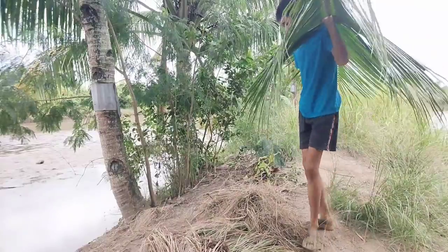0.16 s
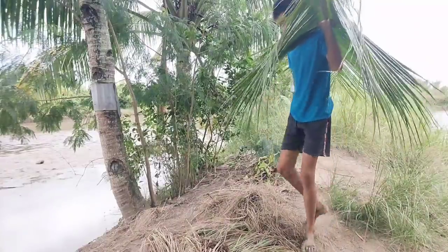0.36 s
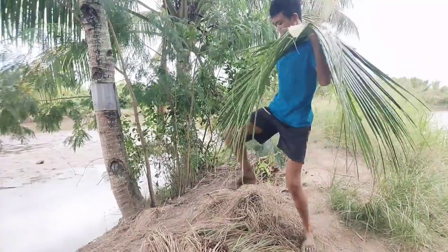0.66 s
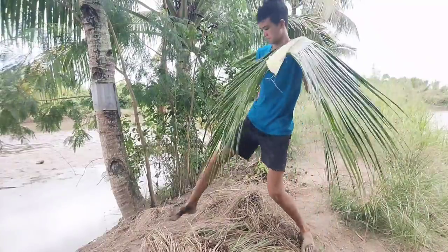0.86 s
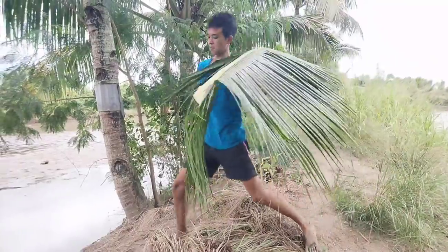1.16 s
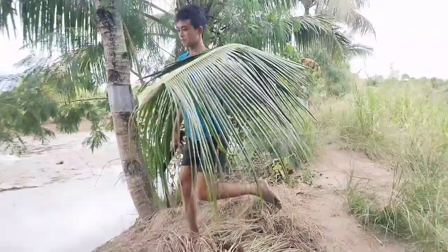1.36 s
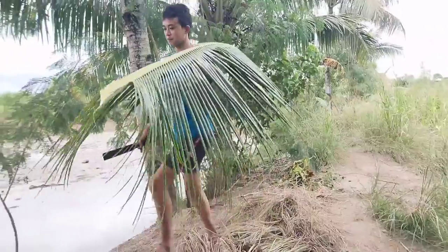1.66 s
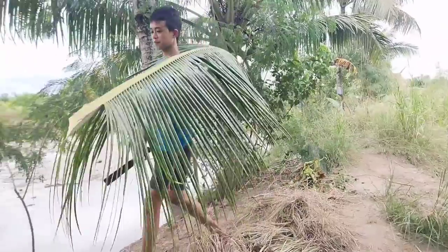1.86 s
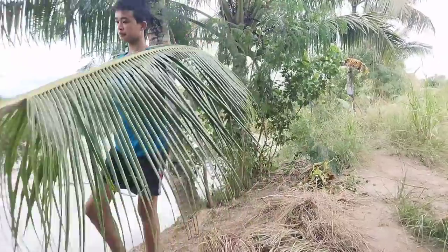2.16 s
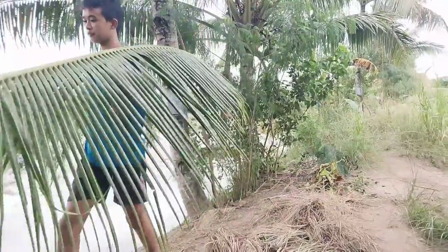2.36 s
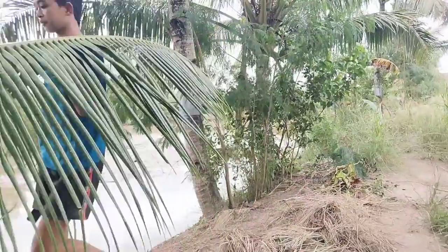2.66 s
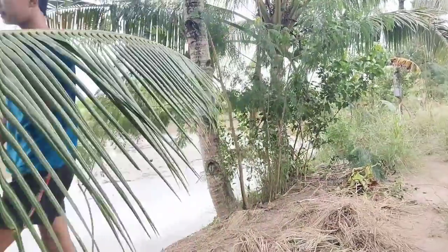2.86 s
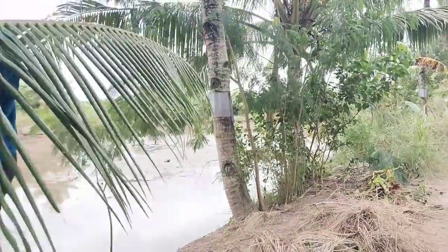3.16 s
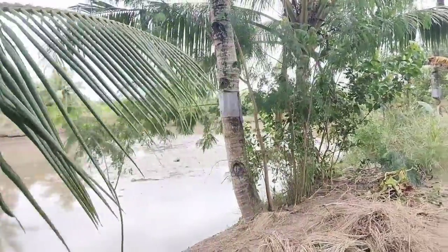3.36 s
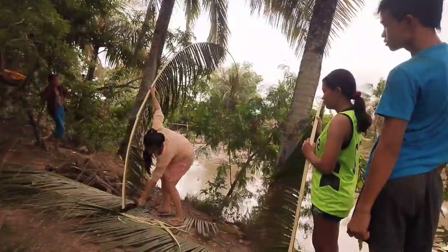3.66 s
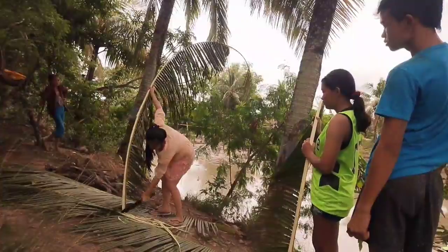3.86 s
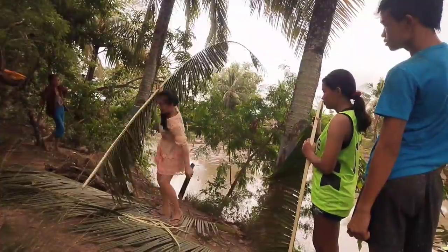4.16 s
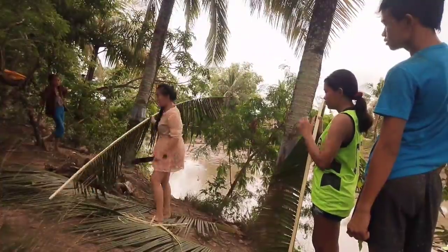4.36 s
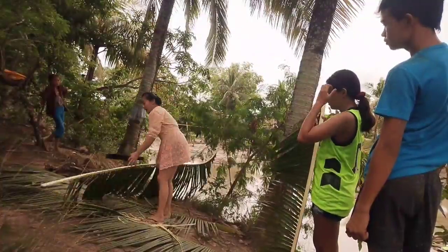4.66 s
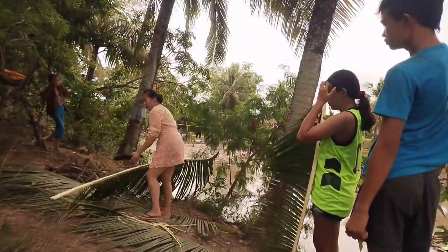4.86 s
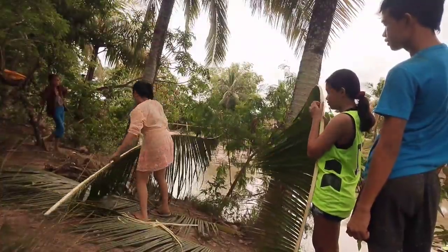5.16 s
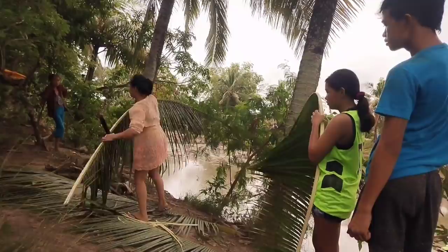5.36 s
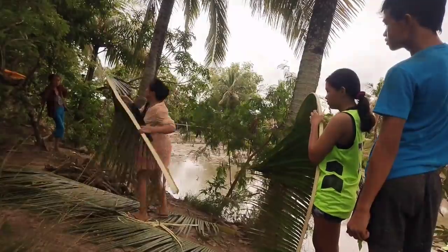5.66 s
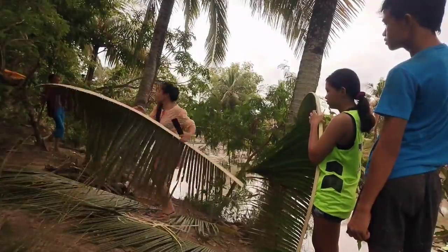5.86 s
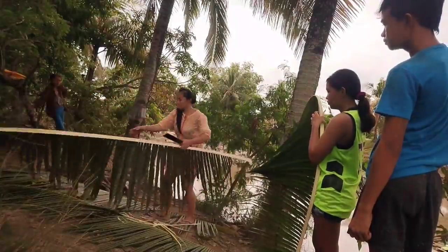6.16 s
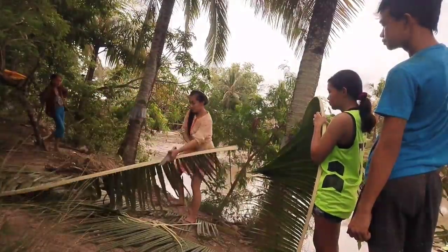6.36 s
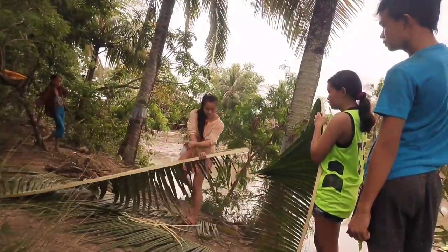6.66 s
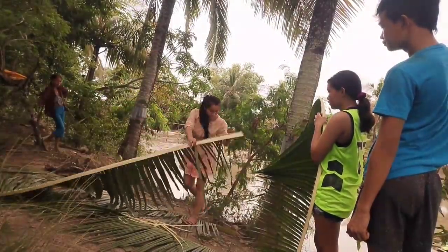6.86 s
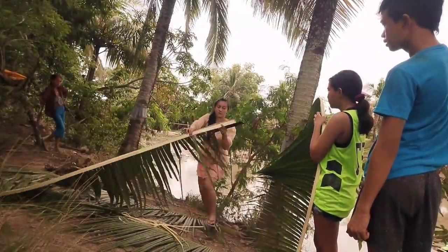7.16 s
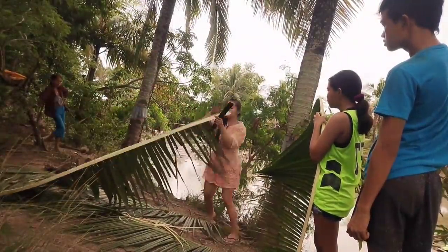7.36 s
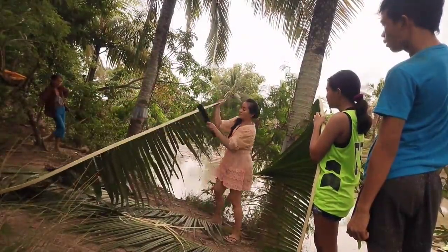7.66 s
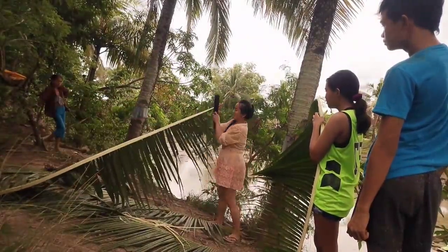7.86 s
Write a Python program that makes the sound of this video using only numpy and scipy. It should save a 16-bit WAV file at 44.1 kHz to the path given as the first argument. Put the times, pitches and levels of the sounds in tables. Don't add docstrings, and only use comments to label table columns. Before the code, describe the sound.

Dry frond rustles and sharp stalk cracks among bright near birdsong, followed by an accelerating insect trill and far whistles ringing between trees.

```python
import sys
import numpy as np
from scipy import signal
from scipy.fft import rfft, irfft
from scipy.io import wavfile
from scipy.ndimage import uniform_filter1d

SR = 44100
rng = np.random.default_rng(int(sys.argv[2]) if len(sys.argv) > 2 else 0)


def waveform_to_disk(signal):
    frames = np.transpose(np.atleast_2d(signal))
    scaled = np.clip(frames, -1, 1) * 32767
    samples = np.round(scaled).astype(np.int16)
    wavfile.write(sys.argv[1], SR, samples)


def invert_db(x):
    u = np.asarray(x, float) / 20
    return 10 ** u


N = 353682


def evened(x):
    return x / np.sqrt(np.mean(x ** 2) + 1e-20)


def read(points, hz):
    f, value = np.transpose(points)
    return np.interp(np.log(hz + 1), np.log(f + 1), value)


def add(mix, s, sound):
    part = mix[..., max(round(s * SR), 0):][..., :sound.shape[-1]]
    part += sound[..., :part.shape[-1]]


def pan(x, pan_db):
    return x * invert_db(np.array([[.5], [-.5]]) * pan_db)


def band(x, edge_hz):
    return signal.sosfilt(signal.butter(4, edge_hz, "band", fs=SR, output="sos"), x)


def resonate(x, hz, width_hz):
    turn = np.exp(2j * np.pi * hz * np.arange(len(x)) / SR)
    r = np.exp(-np.pi * width_hz / SR)
    return 2 * (turn * signal.lfilter([(1 - r) ** 2], [1, -2 * r, r * r], x / turn)).real


def flutter(size):
    return evened(uniform_filter1d(uniform_filter1d(rng.standard_normal(N), size), size))


def air(spectrum, patchy_db):
    frames, hz = N // 256 + 5, np.fft.rfftfreq(1024, 1 / SR)
    a, b, patches = rng.standard_normal((frames, 513, 3)).T
    patches = evened(uniform_filter1d(uniform_filter1d(patches, size=10, axis=0), size=12, axis=1))
    z = (a + 1j * b) * invert_db(read(spectrum, hz)[:, None] + patchy_db * patches)
    return evened(signal.istft(z, nperseg=1024, noverlap=768)[1][:N])


def sides(x):
    return np.array([[1], [-1]]) * x


# (frequency [Hz], density [dB per Hz])
GROVE = [(18, -42), (30, -14), (108, -28.5), (270, 1), (606, -4), (1870, -12), (2130, -12.5), (2620, -12),
         (5890, -13), (13600, -23.5), (15500, -41.5)]
GROVE_SIDE = [(18, -36.5), (30, -8), (1020, -10), (1110, -4), (2490, -17.5), (3320, -33.5), (6370, -25),
              (15500, -36)]


def grove_air():
    return invert_db(-52) * air(GROVE, 2.0) + sides(invert_db(-64) * air(GROVE_SIDE, 1.2))


# (frequency [Hz], density [dB per Hz])
BANK = [(12, -45.5), (20, -29), (104, 6.5), (153, -4), (232, -17), (1930, -36), (4990, -27.5), (7570, -33),
        (9200, -41), (12900, -38.5), (15600, -42)]
BANK_SIDE = [(12, -40), (20, -2), (64, 7), (202, -13), (1110, -20.5), (1630, -25), (4850, -18.5),
             (8500, -26), (13500, -27), (15600, -48)]
# (time [s], rumble level [dB])
BANK_FADE = [
    (0.0, -45),
    (3.621, -47),
    (3.85, -85.5),
]


def bank_air():
    s, db = np.transpose(BANK_FADE)
    fade = invert_db(np.interp(np.arange(N) / SR, s, db - np.median(db)))
    middle = air(BANK, 1.62)
    width = air(BANK_SIDE, 1.2) - 2.0 * resonate(middle, 45, 70)
    return fade * (invert_db(-45) * middle + sides(invert_db(-54.5) * width))


# (start [s], end [s], pitch [Hz], width [Hz],
# level [dB])
DRONES = [(.14, 0.82, 6230, 160, -54), (0.51, 0.795, 4850, 510, -53.5), (2.9, 5.6, 1074, 12, -71),
          (5.203, 8.02, 1141, 8, -69), (0.855, .9, 3170, 640, -47), (1.104, 1.197, 2210, 300, -50),
          (2.313, 2.37, 4970, 700, -51.5), (2.552, 2.64, 5240, 600, -54), (5.38, 5.45, 5300, 900, -58.5),
          (6.89, 7.15, 3700, 900, -54), (7.03, 7.2, 5250, 500, -57), (7.766, 8.06, 5600, 2300, -48),
          (.0, .09, 5500, 250, -54), (7.585, 7.7, 4900, 600, -53), (7.87, 8.04, 3350, 60, -44),
          (7.48, 7.8, 5100, 1400, -56), (4.56, 4.95, 4600, 1300, -53), (.03, .11, 8400, 600, -58),
          (1.1, 1.25, 4900, 700, -54), (1.6, 1.72, 4900, 600, -53), (1.2, 1.37, 10800, 400, -66),
          (1.48, 1.56, 10800, 400, -62), (5.42, 5.58, 4580, 150, -62), (5.42, 5.56, 5420, 200, -63),
          (5.78, 5.93, 5780, 150, -63), (5.79, 5.95, 4800, 250, -61), (5.21, 5.33, 3300, 1100, -58),
          (6.72, 6.83, 3200, 150, -52), (6.4, 7.75, 7200, 1200, -63), (.12, .25, 6200, 400, -48)]


def drones():
    t, noise = np.arange(N) / SR, rng.standard_normal(N)
    out = np.zeros(N)
    for start, end, hz, width_hz, db in DRONES:
        gate = np.clip(np.minimum(t - start, end - t) / 0.016, 0, 1)
        out += invert_db(db) * evened(resonate(noise, hz, width_hz)) * gate
    return out


# (time [s], peak [dB], length [s], centre [Hz])
RUSTLES = [(0.03, -57, 0.06, 8500), (1.164, -42, 0.052, 6000), (1.289, -50, 0.022, 6000),
           (1.31, -54, 0.065, 13500), (1.323, -53, .04, 4500), (1.385, -57, .05, 8000),
           (1.43, -57, 0.035, 14500), (1.424, -55, .04, 5200), (1.557, -51, 0.068, 6500),
           (1.976, -56, 0.04, 9000), (2.576, -51, 0.04, 5000), (3.31, -56, 0.04, 11000)]


def rustles():
    out, t = np.zeros((2, N)), np.arange(SR // 5) / SR
    hz = np.fft.rfftfreq(len(t), 1 / SR) + 1
    for s, db, length, centre_hz in RUSTLES:
        snaps = rng.standard_normal((2, len(t))) * invert_db(3.1 * np.minimum(rng.exponential(1, len(t)), 4))
        snaps[1] = 0.36 * snaps[0] + 1.3 * snaps[1]
        colour = invert_db(-8 * np.log2(hz / centre_hz) ** 2) / (1 + (1500 / hz) ** 2)
        brush = evened(irfft(rfft(snaps) * colour, len(t)))
        swell = np.sin(np.pi * np.clip(t / length, 0, 1) ** .7)
        add(out, s, pan(invert_db(db + 0.5) * brush * swell, 1.9))
    return out


# (time [s], peak [dB], pitch [Hz], ring t60 [s])
CRACKS = [
    (1.179, -25, 4770, 0.038),
    (1.1807, -24, 3700, .008),
    (1.186, -29.5, 2460, 0.04),
    (1.191, -19, 3700, 0.0079),
    (1.394, -24.5, 2880, 0.0065),
    (2.585, -18, 224, 0.0056),
]
# (time [s], peak [dB], pitch [Hz])
TICKS = [
    (1.1692, -34, 8000),
    (1.1821, -30, 8000),
    (1.189, -32, 9000),
    (1.4381, -34, 13000),
    (1.4645, -36, 11000),
    (1.5708, -31, 10000),
]


def cracks():
    out = np.zeros((2, N))
    t = np.arange(SR // 20) / SR
    for s, db, hz, t60 in CRACKS:
        add(out, s, invert_db(db - 60 * t / t60) * np.sin(2 * np.pi * hz * t)[None])
    t = np.arange(-40, 40) / SR
    for s, db, hz in TICKS:
        add(out, s, pan(invert_db(db) * np.cos(2 * np.pi * hz * t) * np.exp(-(t / .00006) ** 2), 1.5))
    return out


# (frequency [Hz], t60 [s])
TREES = [(1500, 0.54), (4000, 0.81), (9000, 0.43)]


def echo(x, stretch, start_s):
    taps = np.zeros((2, SR))
    at = np.arange(0, SR - 20, 20) + rng.integers(0, 20, (2, SR // 20 - 1))
    np.put_along_axis(taps, at, rng.choice([-1., 1.], at.shape), axis=1)
    hz, t, z = signal.stft(taps, SR, nperseg=256)
    z = z * invert_db(-60 * t / (stretch * read(TREES, hz)[:, None])) * np.clip(t / start_s, 0, 1)
    tail = signal.istft(z, SR, nperseg=256)[1]
    return signal.fftconvolve(x[None], tail / np.linalg.norm(tail[0]), axes=1)[:, :N]


def bird(notes, partials, waver, halo_db, halo_size):
    out, shake = np.zeros(N), flutter(size=90)
    for rows in notes:
        s, hz, db = np.transpose(rows)
        t = np.arange(s[0], max(s[-1], s[0] + .004), 1 / SR)
        effort_db = np.interp(t, s, db)
        pitch = uniform_filter1d(np.interp(t, s, hz), size=60) * (1 + waver * shake[(t * SR).astype(int) % N])
        turns = 2 * np.pi * np.cumsum(pitch) / SR
        tone = 0
        for off_hz, share_db in partials:
            share = invert_db(share_db + (share_db < -9) * .9 * (effort_db + 22))
            tone = tone + share * np.sin(turns + 2 * np.pi * off_hz * t)
        edge = np.sin(np.pi / 2 * np.clip(np.minimum(t - t[0], t[-1] - t) / .003, 0, 1)) ** 2
        add(out, s[0], np.sqrt(2) * invert_db(effort_db) * tone * edge)
    return out, invert_db(halo_db) * out * flutter(halo_size)


def strokes(rows, bend, rise_db, rise_s, fade_db_per_s, scoop_hz=0):
    u, notes = np.linspace(0, 1, 25), []
    for s, length, from_hz, to_hz, db in rows:
        t = length * u
        pitch = to_hz + (from_hz - to_hz) * (1 - u) ** bend - scoop_hz * np.exp(-t / .005)
        effort_db = db + rise_db * np.exp(-t / rise_s) + fade_db_per_s * t - 3 * u ** 8
        notes.append(np.transpose([s + t, pitch, effort_db]))
    return notes


def whistle(s, length, hz, climb_hz, db):
    t = np.linspace(0, length, 90)
    wobble = -np.cos(2 * np.pi * 47.5 * t) * np.exp(-t / .05)
    pitch = hz - climb_hz * np.exp(-(t / .024) ** 2) + 450 * wobble
    effort_db = db - 21 * np.exp(-t / 0.025) - 40 * t + 3 * wobble
    return np.transpose([s + t, pitch, effort_db])


def close_by(song, halo, pan_db, flutter_size):
    direct = pan(song * (1 + 0.1 * flutter(flutter_size)), pan_db)
    return direct + invert_db(-8.5) * echo(song, 0.15, 0.0021) + echo(halo, 0.11, 0.002)


# (offset [Hz], share [dB])
THIN_PARTIALS = [(-3900, -29), (-1.5, 1), (3903.5, -33), (7797, -43)]
# (start [s], length [s], held pitch [Hz], climb [Hz], level [dB])
THIN_WHISTLES = [
    (0.121, 0.1, 7170, 750, -17.5),
    (0.342, 0.169, 7480, 560, -20.5),
]
# (start [s], length [s], from [Hz], to [Hz], level [dB])
THIN_TWITTER = [(.229, 0.042, 7080, 7250, -24.5), (.283, 0.013, 7150, 7240, -41),
                (.523, 0.038, 7000, 7750, -38.5), (.565, 0.026, 7030, 7700, -39),
                (.612, 0.044, 7250, 7900, -38), (.657, 0.0165, 7230, 7850, -31.5),
                (.674, 0.016, 7550, 8050, -34.5), (.692, 0.028, 7200, 8500, -32),
                (.722, 0.035, 7480, 7950, -33.5), (.755, 0.019, 8450, 8000, -43),
                (.772, 0.022, 7820, 7850, -35.5)]


def thin_bird():
    notes = [whistle(*row) for row in THIN_WHISTLES] + strokes(THIN_TWITTER, 0.5, -8.5, 0.01, -7)
    song, halo = bird(notes, THIN_PARTIALS, 0.005, -24.0, halo_size=25)
    return close_by(song, halo, -5.5, flutter_size=200)


# (start [s], length [s], from [Hz], to [Hz], level [dB])
NEAR_HELD = [(.926, 0.016, 3650, 3570, -17.5), (.918, 0.0086, 3420, 3400, -27),
             (.94, 0.023, 3676, 3480, -18), (1.018, 0.064, 3693, 3390, -16.5),
             (1.219, .04, 2740, 3070, -18.5), (1.265, .011, 4520, 4300, -27),
             (1.539, 0.038, 3330, 3096, -21.5), (1.838, 0.034, 4350, 4190, -40.5),
             (1.895, .04, 3610, 3550, -36.5), (1.943, 0.032, 4600, 4420, -40)]
NEAR_SCOOPS = [
    (.884, 0.017, 3480, 3435, -22),
    (.902, 0.016, 3680, 3700, -14.5),
    (1.672, 0.089, 3744, 3413, -15),
]
NEAR_SWELLS = [
    (1.35, 0.045, 2300, 2180, -45.5),
    (1.467, 0.031, 4060, 3915, -22),
    (1.638, 0.026, 3040, 3060, -28),
    (1.274, .031, 4280, 4520, -29),
]
NEAR_SLURS = [(.871, 0.013, 3670, 2650, -37), (.958, 0.013, 3450, 2620, -26.5),
              (1.08, 0.0178, 3470, 2640, -23), (1.197, 0.013, 2690, 2550, -31),
              (1.312, 0.031, 4260, 2720, -29.5), (1.393, 0.006, 2330, 1890, -25),
              (1.505, 0.031, 3750, 2824, -24.5), (1.528, .012, 2910, 3300, -26),
              (1.87, 0.03, 4190, 3600, -35), (1.988, 0.012, 4950, 5050, -42.5),
              (2.012, .01, 4850, 4900, -50), (1.66, .013, 3080, 3350, -28), (2.065, 0.017, 4700, 4800, -51)]


def near_bird():
    notes = strokes(NEAR_HELD, 1.11, -15.5, 0.0046, -71)
    notes += strokes(NEAR_SCOOPS, 1.15, -11.5, 0.0045, -130, 510)
    notes += strokes(NEAR_SWELLS, 1.16, -13, 0.0061, 60, -300)
    notes += strokes(NEAR_SLURS, 1.11, -4, 0.0052, 30)
    song, halo = bird(notes, [(0.0069, 0.59)], 0.0061, -19.0, halo_size=22)
    return close_by(song, band(halo, (2450, 3900)), -.6, flutter_size=120)


def sweep(from_hz, to_hz, length_s):
    u = np.linspace(0, 1, round(length_s * SR))
    return np.sin(2 * np.pi * np.cumsum(from_hz + (to_hz - from_hz) * u) / SR) * np.sin(np.pi * u)


# (time [s], high chamber peak [dB], low chamber against it [dB])
SLOW = [(1.8422, -51, -20), (1.972, -49.5, -4), (2.0934, -47, -17), (2.214, -41.5, -13), (2.3286, -42, -4),
        (2.4422, -40.5, -3.5), (2.5604, -41, -2), (2.6761, -40, -1), (2.7923, -38, 0), (2.9027, -40, 1),
        (3.0074, -40, 3.5), (3.117, -39, 4), (3.219, -39, 2.5), (3.324, -39, 3.5), (3.4107, -42.5, 7),
        (3.472, -49, 11)]


def slow_strokes(efforts, flicks):
    t = np.arange(SR // 8) / SR
    for s, db, low_db in SLOW:
        stroke = invert_db(db - 6) * np.clip(t / 0.00043, 0, 1) * (np.exp(-t / 0.022) + .5 * np.exp(-t / 0.13))
        add(efforts[0], s, stroke)
        add(efforts[2], s + 0.0021, invert_db(low_db) * stroke)
        flick = sweep(4000, 9300, 0.021)
        add(flicks, s - .009, invert_db(db - 8) * flick * np.linspace(.6, 1.3, len(flick)))


def fast_strokes(efforts, flicks):
    k, t = np.arange(22), np.arange(SR // 8) / SR
    since = .0596 * k + .000355 * k ** 2
    peak_db = -25 - 5 * np.exp(-since / 0.082) - 5.5 * (since / since[-1]) ** 3
    for s, db in zip(3.4975 + since, peak_db):
        add(efforts[1], s, invert_db(db - 10) * np.clip(t / .003, 0, 1) * np.clip((.03 - t) / .012, 0, 1))
        add(efforts[2], s + 0.027, invert_db(db - 8.5) * np.clip(np.minimum(t / 0.0051, (.049 - t) / .016), 0, 1))
        late = np.clip((s - 4.42) / 0.17, 0, 1)
        add(flicks, s - .003, (0.5 + late) * invert_db(db - 9) * sweep(8600, 6200, 0.02))
        add(flicks, s - .03, late * invert_db(db - 23) * sweep(4300, 5900, .018))


def faint_strokes(efforts):
    t = np.arange(SR // 8) / SR
    for k in range(10):
        add(efforts[0], 6.45 + .123 * k, invert_db(-62) * np.exp(-t / 0.041))


# (from [Hz], to [Hz])
CHAMBERS = [
    (6640, 8300),
    (7350, 8200),
    (5810, 7000),
]


def insect():
    sizes = invert_db(0.64 * np.minimum(rng.exponential(1, N), 3))
    clicks = (rng.random(N) < 2500 / SR) * sizes * rng.choice([-1, 1], N)
    efforts, flicks = np.zeros((3, N)), np.zeros(N)
    slow_strokes(efforts, flicks)
    fast_strokes(efforts, flicks)
    faint_strokes(efforts)
    rung = [band(clicks * effort, edge) / band(clicks, edge).std() for effort, edge in zip(efforts, CHAMBERS)]
    rung[2] = 0.75 * rung[2] + 0.85 * resonate(rung[2], 6580, 510)
    rung[1] = 0.64 * rung[1] + 0.7 * resonate(rung[1], 7720, 500)
    rasp = invert_db(-15.5) * band(evened(clicks) * efforts.sum(0), (4500, 12500))
    buzz = sum(rung) + rasp + flicks * (2.1 + .8 * flutter(size=36))
    return buzz + invert_db(-3) * echo(buzz, 1.0, .01)[0]


# (start [s], length [s], from [Hz], to [Hz], level [dB])
DEEP_EARLY = [(4.243, .056, 2160, 2035, -57), (4.3, 0.072, 2200, 2700, -53),
              (4.365, 0.065, 2700, 2600, -58), (4.425, 0.034, 2604, 2215, -51.5),
              (4.566, .02, 3670, 4190, -50), (4.586, 0.09, 4200, 3900, -52), (4.59, .06, 4550, 4450, -55),
              (4.665, .015, 4090, 3800, -49), (5.188, 0.025, 2345, 2750, -56),
              (5.212, 0.021, 2300, 3310, -53), (5.22, .026, 3000, 4200, -48),
              (5.235, .012, 2490, 3300, -51), (5.53, .014, 3900, 3950, -55),
              (5.365, .02, 3930, 4170, -52.5), (5.43, 0.017, 3800, 4100, -53),
              (5.505, 0.029, 3960, 4000, -56.5), (5.512, 0.02, 5350, 5100, -56)]
DEEP_LATE = [(5.725, .035, 3450, 4280, -54), (5.766, 0.016, 4950, 5800, -50),
             (5.766, 0.027, 3600, 4800, -55), (5.972, 0.062, 1910, 1790, -57),
             (6.245, 0.02, 2430, 2620, -51), (6.42, 0.021, 3310, 2720, -51.5),
             (6.54, .015, 7330, 7330, -58), (7.08, 0.012, 5340, 5170, -43),
             (7.765, 0.034, 6700, 5140, -45.5), (7.9, 0.046, 5800, 5290, -47)]


def deep_bird():
    song, halo = bird(strokes(DEEP_EARLY + DEEP_LATE, 1.1, -6, .006, -10), [(0, 0)], .005, -5, halo_size=40)
    scattered = echo(invert_db(-0.5) * song + 0.95 * halo, 0.97, 0.0036)[0]
    return invert_db(1.0) * song + 0.94 * halo + scattered


def warble(s, length, hz, swing_hz, per_s, db):
    t = np.linspace(0, length, 60)
    return [np.transpose([s + t, hz - swing_hz * np.sin(2 * np.pi * per_s * t), db + 0 * t])]


# (start [s], length [s], from [Hz], to [Hz], level [dB])
FAR_DIVES = [
    (6.705, .03, 4060, 2590, -36),
    (6.89, 0.031, 2945, 2570, -38.5),
    (7.145, 0.0623, 2900, 2680, -34),
    (7.485, 0.042, 4273, 3986, -33),
    (7.555, .034, 3733, 2480, -33.5),
    (7.843, .033, 4610, 3345, -32),
    (6.68, 0.029, 3750, 4150, -42.5),
    (7.89, 0.0185, 2900, 4100, -39),
]
FAR_GLIDES = [(6.985, 0.019, 2400, 2150, -42.5), (7.005, .045, 2120, 2030, -49.5),
              (6.8, 0.051, 2700, 2950, -51), (7.105, 0.011, 2000, 2400, -50), (7.09, .035, 1800, 1750, -58),
              (7.42, .025, 3300, 3100, -40), (7.615, 0.035, 1720, 1850, -47),
              (7.31, 0.083, 1900, 2290, -46.5), (6.79, 0.0177, 2500, 3030, -42),
              (6.935, 0.027, 2150, 2430, -45.5), (7.082, 0.018, 2300, 2150, -49),
              (7.215, 0.053, 2720, 2608, -34.5), (7.25, 0.063, 1730, 1704, -51),
              (7.363, 0.012, 4170, 3500, -42), (7.378, 0.036, 3790, 2900, -31),
              (7.452, 0.014, 2800, 2200, -41), (7.61, 0.0554, 2330, 2726, -44),
              (7.72, 0.0147, 3590, 2810, -37.5), (7.742, 0.013, 3300, 2300, -43),
              (7.905, 0.033, 4240, 3720, -33.5), (7.52, 0.0266, 3987, 4200, -31)]
# (start [s], length [s], centre [Hz], swing [Hz], rate [turns per s], level [dB])
WARBLE = (7.462, .09, 2290, 210, 39.5, -39)


def far_bird():
    notes = strokes(FAR_DIVES, 2.92, -7, 0.0052, -11) + strokes(FAR_GLIDES, 1.05, -2.5, 0.0039, -20)
    song, halo = bird(notes + warble(*WARBLE), [(0, 0)], .003, -9, halo_size=70)
    ringing = echo(invert_db(-3.0) * song + halo, 1.34, 0.0044)[0]
    return invert_db(1.0) * song * (1 + 0.32 * flutter(size=130)) + ringing * (1 + .3 * flutter(size=900))


def scene():
    near = bank_air() + rustles() + cracks() + thin_bird() + near_bird()
    distant = drones() + insect() + deep_bird() + far_bird()
    return grove_air() + near + distant


def roll_off(x):
    return signal.sosfilt(signal.butter(12, 15780, fs=SR, output="sos"), x)


# (time [s], edge [Hz])
TOP_EDGE = [(3.4, 15700), (3.68, 15200), (3.7, 13000), (4.93, 13000), (5.0, 14300)]


def record(dry):
    hz, t, z = signal.stft(dry, SR, nperseg=1024)
    level_db = 10 * np.log10(uniform_filter1d((abs(z) ** 2).mean(0), size=9, axis=0) + 1e-14)
    hz_column = hz[:, None]
    fall_db = 40 * np.log2(hz_column + 1)
    mask_db = np.maximum.accumulate(level_db + fall_db * (hz_column > 2000), axis=0) - fall_db - 28.5
    kept = np.clip((level_db - mask_db) / 3, .03, 1)
    jitter_hz = 130 * rng.standard_normal(len(t) // 3 + 1).repeat(3)[:len(t)]
    edge_hz = np.interp(t, *np.transpose(TOP_EDGE)) + jitter_hz
    luck = rng.standard_normal(kept.shape)
    luck = evened(uniform_filter1d(uniform_filter1d(luck, size=5, axis=1), size=4, axis=0))
    holes = luck > 4.0 - hz_column / 5000
    islands = (luck < -1.6) & (hz_column < 14600)
    kept = kept * ~holes * ((hz_column < edge_hz) | islands)
    mix = signal.istft(z * kept, SR, nperseg=1024)[1][:, :N]
    return roll_off(mix)


dry = scene()
out = record(dry)
waveform_to_disk(out)
```